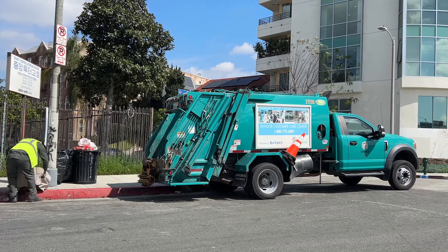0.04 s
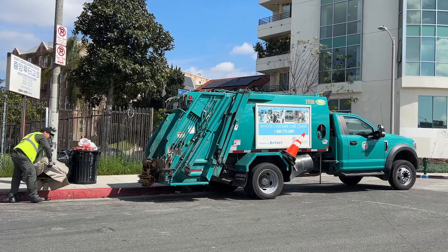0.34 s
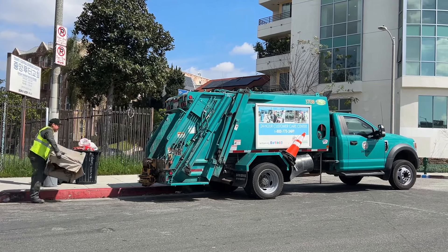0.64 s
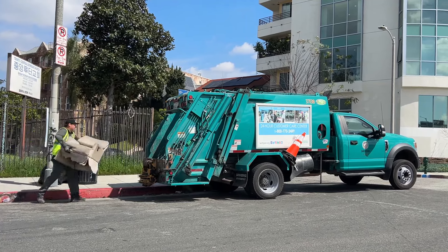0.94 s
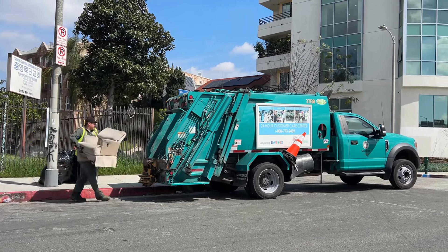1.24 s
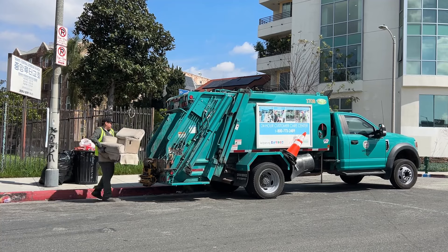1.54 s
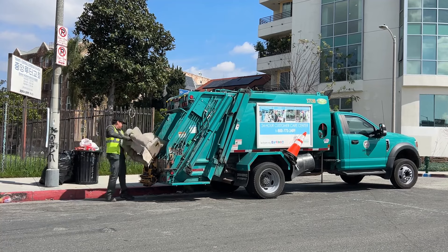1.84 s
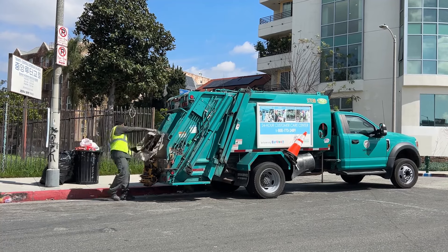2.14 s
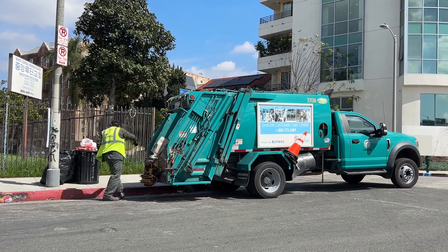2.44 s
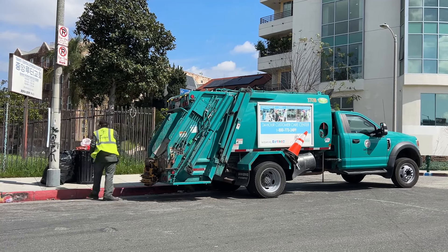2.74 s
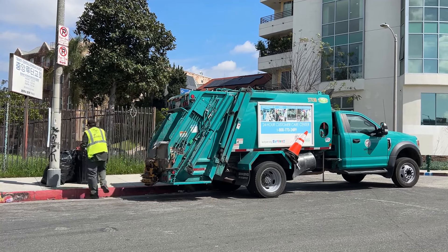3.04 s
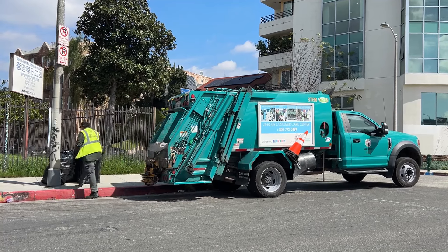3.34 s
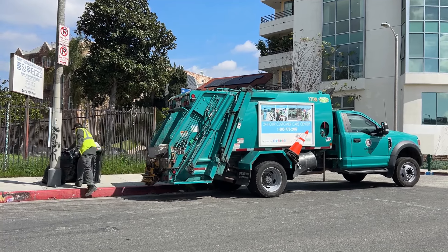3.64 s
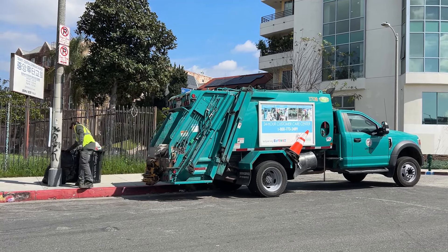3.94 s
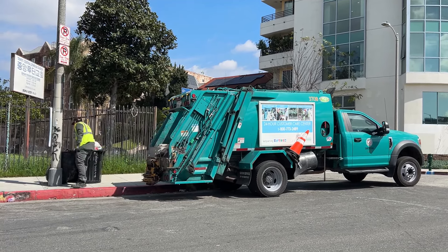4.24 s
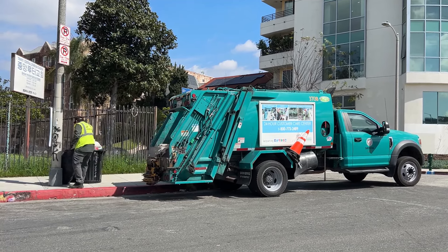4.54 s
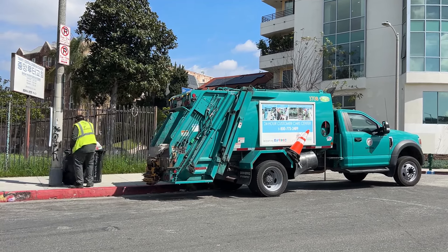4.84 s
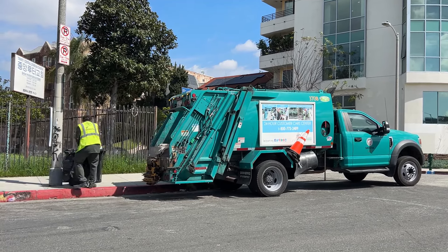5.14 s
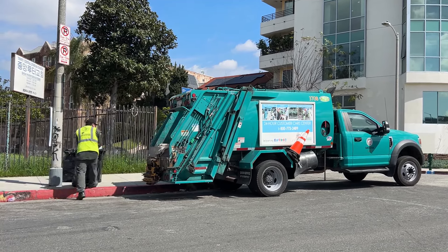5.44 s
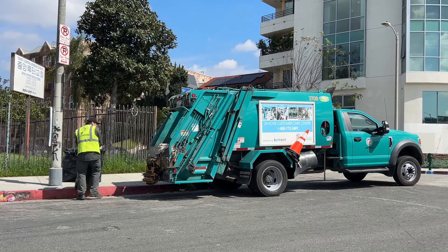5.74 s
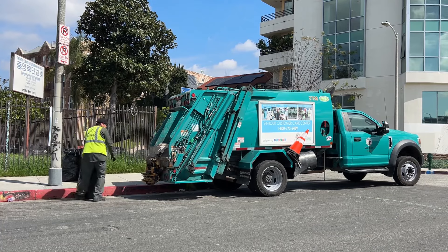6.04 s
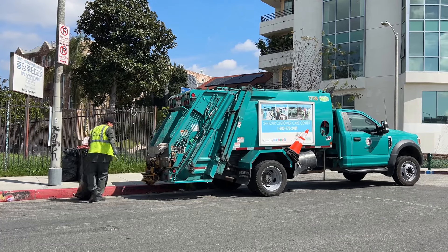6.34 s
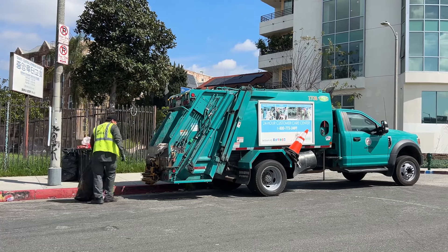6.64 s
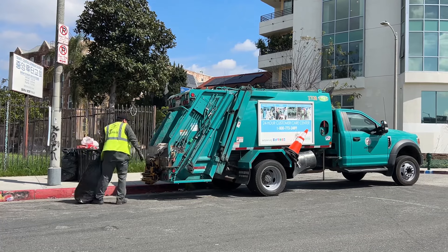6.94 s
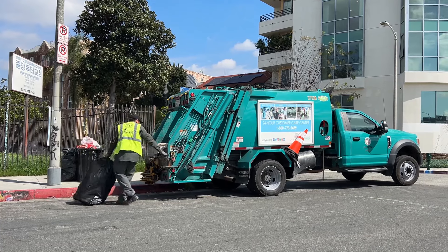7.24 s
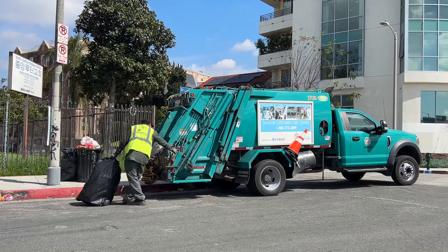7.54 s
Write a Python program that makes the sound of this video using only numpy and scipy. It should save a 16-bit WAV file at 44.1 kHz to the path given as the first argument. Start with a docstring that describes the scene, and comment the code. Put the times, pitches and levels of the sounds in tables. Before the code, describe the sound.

A small garbage truck runs throughout, heard in stereo from across a street. In the first second its revs and whine fall, then it holds a low, loping idle with fan noise and a steady whine. From about 1.8 to 2.5 seconds cardboard is thrown into the hopper, buckling and cracking with several hollow thuds and a short ring of the steel floor. At about 3.1 seconds a steel street bin is banged loudly, with a lighter knock at 3.5. From 4 to 5 seconds a plastic trash bag is gathered, crinkling and snapping, with a soft bump. From about 5.3 to 7.6 seconds it is dragged over the pavement in quiet, swishing pulls, with a small knock near 6. Around 7.7 seconds a quick cluster of heavy knocks hits the tailgate, its steel fittings ringing and chattering. Buildings give the work a faint, short echo.

```python
"""A small garbage truck across the street settles to idle: fan roar, a loping exhaust, a belt-driven whine.
Near 2 s a worker throws cardboard into the hopper; it buckles, thuds and rings the steel floor.
Near 3 s a steel street bin is banged. From 4 s a plastic bag is gathered, then dragged, its film
sliding and its creases snapping. Last come knocks on the tailgate, with ringing, chattering fittings.
House fronts answer the work, and a pair of small microphones hears it all."""
import sys
import numpy as np
from scipy import signal
from scipy.fft import rfft, irfft, next_fast_len
from scipy.io import wavfile

SR = 44100
rng = np.random.default_rng(int(sys.argv[2]) if len(sys.argv) > 2 else 0)


def bounce(signal):
    """Save signal as a 16-bit WAV file at the path given by the first command-line argument."""
    frames = np.transpose(np.atleast_2d(signal))
    limited = np.clip(frames, -1, 1)
    pcm = np.round(limited * 32767).astype(np.int16)
    wavfile.write(sys.argv[1], SR, pcm)


N = 343098
TIME = np.arange(N) / SR

# engine runs down, sags a little and finds its idle: t/s, speed/rpm
ENGINE_RPM = [(0.0, 1191.7), (0.46, 1124.0), (0.82, 1035.6), (2.2, 1010.6), (3.55, 1023.5), (4.0, 1017.7),
              (4.8, 1020.6), (5.25, 1017.8), (7.78, 1023.1)]
# bed of fan, engine bay and distant traffic at idle: f/Hz, level/dB per Hz
ROAR_EQ = [(20, -88), (30, -77), (42, -53.5), (70, -50), (105, -55), (160, -66), (380, -67.5), (680, -75),
           (1000, -72), (1500, -80), (1850, -81), (2600, -90.5), (4200, -90.5), (6300, -97.5),
           (15000, -109)]
# exhaust tones: multiple of the four-stroke cycle (8 is the firing rate), base level/dB
EXHAUST_TONES = [(5, -62), (6, -58.5), (7, -31), (8, -26), (9, -41), (10, -27), (11, -57), (12, -59),
                 (13, -55), (14, -57), (16, -54), (23, -50.5)]
# engine load rides the firing tone: t/s, gain/dB
ENGINE_LOAD = [(0.06, -1.5), (.15, 2), (.6, 3), (.76, -4.5), (2.2, -3), (4.6, 0.5), (5.3, -1.5),
               (7.78, 1.5)]
# resonances that the pump's fundamental slides through: f/Hz, half width/Hz, level/dB
PUMP_PEAKS = [(293.4, 10.7, -26.5), (323.7, 5, -29.5), (346, 5.7, -41)]
# pump overtones: multiple, base level/dB, flutter share (0-1)
PUMP_OVERTONES = [(2, -47, 0.56), (3, -46, 0.48), (4, -55.5, 1), (6, -59.5, 0.9), (9, -67, 0.6),
                  (12, -57.5, 0.99), (13, -69, 0.66), (15, -66, 0.8), (18, -68.5, 0.8)]
# pump housing resonances that the overtones slide through: f/Hz, half width/Hz, gain/dB
HOUSING_PEAKS = [(3673, 72, 7), (4150, 60, 7)]
# overtone lift at full revs: f/Hz at idle, gain/dB
REVVED_EQ = [(590, 4), (880, 2.5), (1180, -0.5), (2600, 3.5), (3500, 2.5), (4400, 7), (5300, 0)]
# pump overtones that rasp only above idle: multiple
RASP_MULTIPLES = [11, 13, 14, 16, 17, 21]

# pulls on the bag: t/s of the fastest slide, length/s, level/dB
BAG_PULLS = [(4.297, .4, -59), (4.62, .2, -52), (4.908, 0.26, -49), (5.818, 0.5, -52.5),
             (6.02, 0.049, -44.5), (6.403, 0.13, -53.5), (6.746, 0.27, -45), (7.04, .05, -50),
             (7.323, 0.54, -51.5)]
# the loudest creases snapping: t/s, level/dB
BAG_SNAPS = [(4.1651, -32), (4.2151, -28), (4.3617, -30), (4.498, -36), (4.565, -38), (4.579, -30),
             (4.638, -33), (4.7138, -27), (5.0834, -35), (6.333, -42), (7.18, -42)]
# colour of sliding plastic film: f/Hz, gain/dB
FILM_EQ = [(300, -20.5), (1500, 2), (4000, -1), (6000, -3.5), (8000, 1), (11500, -8), (15500, -4.5)]
# colour of a snapping crease: f/Hz, gain/dB
CREASE_EQ = [(500, -33.5), (2500, 0.5), (4500, -4), (7500, 0.5), (11000, -10.5), (16000, -9.5)]
# thin sizzle of plastic on pavement and steel on steel: f/Hz, gain/dB
SIZZLE_EQ = [(3000, -35), (8000, -12), (11500, -2.5), (15400, 4), (16500, -7)]

# crushing knocks: t/s, clack level/dB, crack level/dB, fade/s
CRUSHES = [(1.849, -17.5, -34, 0.026), (1.858, -22, -28, .012), (1.869, -26, -25, .016),
           (1.923, -40, -29, .009), (2.167, -29, -31.5, 0.0194), (2.213, -37, -23.5, 0.0067),
           (2.325, -26, -24.5, 0.024), (2.435, -47, -37.5, .01), (2.836, -49, -40, 0.014),
           (3.087, -41, -26.5, 0.03), (3.104, -21.5, -25, 0.029), (3.492, -29.5, -34, .05),
           (3.61, -34, -46.5, .034), (4.2, -45, -58, .09), (4.77, -33.5, -58, 0.1),
           (6.008, -33, -42.5, 0.057), (7.651, -25, -31.5, 0.018), (7.678, -28.5, -33.5, 0.062),
           (7.704, -23, -24.5, 0.013), (7.72, -23, -48, 0.12)]
# dull body of a knock: f/Hz, gain/dB
CLACK_EQ = [(60, -23), (200, 7), (380, 0), (480, 2), (580, -7), (700, -6.5), (860, -0.5), (1300, -9.5),
            (2200, -26), (5000, -29.5), (16000, -60)]
# bright edge of a knock: f/Hz, gain/dB
CRACK_EQ = [(300, -32), (1100, -14.5), (1500, -1), (1780, 7.5), (2200, -3.5), (3800, -0.5), (6000, -10),
            (8500, -8), (12000, -16), (16000, -17.5)]
# heavy hits on hollow containers: t/s, level/dB, pitch factor, damping of highs/dB per octave
HOLLOW_HITS = [(1.852, -20, 1.14, 5.5), (1.868, -21.5, 1.12, 11), (2.163, -28.5, 1.96, 6),
               (2.178, -26.5, 1.2, 4), (2.336, -15, 0.97, 7), (3.131, -14.5, .95, 7), (3.505, -27, 2.56, 6),
               (7.712, -20, 0.86, -2), (7.738, -13.5, 1.02, 2.5)]
# boom of a hollow container: base f/Hz, gain/dB, t60/s
HOLLOW_MODES = [(83, -7.5, 0.34), (115.5, 2, 0.18), (161.3, 0.5, 0.16), (186, 7, .22), (227.6, -1, 0.12),
                (376, -7.5, 0.31), (488, -11, 0.34), (814, -1.5, 0.064)]
# ring of the hopper's steel floor: f/Hz, gain/dB, t60/s
FLOOR_MODES = [(1783, 1, 0.12), (1804, -4.5, 0.077), (1820, -14, 0.081)]
# hits on the steel street bin: t/s, level/dB, damping of highs/dB per octave
BIN_HITS = [(3.087, -18.5, -1), (3.103, -19.5, 2), (3.502, -33, -2)]
# ring of the bin: f/Hz, gain/dB, t60/s
BIN_MODES = [(632, -7.5, 0.23), (1797, -7.5, 0.044), (1846, -0.5, 0.054), (1910, -6, 0.055),
             (2070, -24, 0.037), (3590, -11.5, 0.076), (3838, -13, 0.17)]
# hits on the tailgate's steel fittings: t/s, level/dB, damping of highs/dB per octave
LATCH_HITS = [(7.652, -30.5, -3.5), (7.708, -23.5, 3), (7.724, -24.5, 5)]
# ring of the fittings: f/Hz, gain/dB, t60/s
LATCH_MODES = [(1057, -4.5, 0.091), (1276, -0.5, 0.059), (1463, 1.5, 0.065), (2290, -8, 0.065),
               (2610, -10, .05), (4920, -8, 0.039), (5330, -8, 0.029)]

# stereo width: f/Hz, left-right likeness (1 is mono)
MIC_LIKENESS = [(350, .996), (470, .9), (700, .68), (2500, .65), (4000, .7), (5800, .62), (7600, .87),
                (16000, .86)]
# stereo balance: f/Hz, left minus right/dB
MIC_BALANCE = [(300, 0.5), (700, 1), (1100, 1.5), (1750, -2.5), (2300, 7), (3300, 3.5), (4900, 5),
               (6000, 1), (7500, 0)]
# phase between the microphones: f/Hz, lead of the left/rad
MIC_PHASE = [(0, 0), (1720, -0.7), (3100, 0.7), (5940, -0.8), (6720, 0.1), (8180, -0.1), (9040, -2.8),
             (10200, -3.4), (11100, -6.3), (12000, -6.2), (12800, -9.0), (13700, -9.6), (15100, -12.5),
             (16500, -12.6)]

GATHER_SPAN, DRAG_SPAN = (4.15, 5.0), (5.25, 7.6)  # bag gathered, then dragged: from t/s, to t/s
HOPPER_SPAN, TUMBLE_SPAN = (1.8, 2.6), (1.95, 2.115)  # cardboard on the floor; scraps tumbling after it
KNOCK_ATTACK = 0.153  # share of a knock's fade: long crushes start softly


def amp(db):
    """Decibels to gain."""
    return 10 ** (np.asarray(db) / 20)


def unit(x):
    """Scales to rms 1."""
    return x / np.sqrt(np.mean(x ** 2) + 1e-20)


def curve(rows):
    """An automation lane at every sample."""
    return np.interp(TIME, *np.transpose(rows))


def read(points, hz):
    """Reads a curve on a log-frequency axis."""
    f, value = np.transpose(points)
    return np.interp(np.log(hz + 1), np.log(f + 1), value)


def add(mix, s, sound):
    """Mixes a sound in at time s."""
    part = mix[round(s * SR):][:len(sound)]
    part += sound[:len(part)]


def drift(rate_hz):
    """A smooth random modulator, rms 1."""
    size = next_fast_len(N, True)
    hz = np.fft.rfftfreq(size, 1 / SR)
    return unit(irfft(rfft(rng.standard_normal(size)) * np.exp(-(hz / rate_hz) ** 2), size)[:N])


def colour(x, eq, size=2048):
    """Minimum-phase EQ of unit energy: the curve sets tone, not level."""
    log_gain = np.log(amp(read(eq, abs(np.fft.fftfreq(size, 1 / SR)))))
    taps = np.fft.ifft(np.exp(np.conj(signal.hilbert(log_gain)))).real
    return signal.oaconvolve(x, taps / np.linalg.norm(taps))[:N]


def grains(per_s, spread_db):
    """A dense train of tiny clicks of uneven size, rms 1."""
    size = amp(spread_db * np.minimum(rng.exponential(1, N), 4))
    return unit(size * rng.choice([-1, 1], N) * (rng.random(N) < per_s / SR))


def scattered(span, per_s, spread_db, size=64):
    """Loosely spaced random cues in a span: t/s, level offset/dB."""
    jitter, strength = rng.standard_normal((size, 2)).T
    times = span[0] + (np.arange(size) + .5 + .3 * jitter) / per_s
    return [(s, db) for s, db in zip(times, spread_db * np.clip(strength, -2, 2)) if s < span[1]]


def ring(modes, pitch=1, dull_db=0):
    """Dying modes of one hit; a soft hit tilts them darker around the strongest."""
    t = TIME[:SR // 2]
    centre_hz = max(modes, key=lambda mode: mode[1])[0]
    return sum(amp(db - dull_db * np.log2(hz / centre_hz)) * np.exp(-np.log(1000) * t / t60)
               * np.sin(2 * np.pi * hz * pitch * t) for hz, db, t60 in modes)


def revs():
    """How far the engine is above idle, 0 to 1."""
    idle, top = ENGINE_RPM[-1][1], ENGINE_RPM[0][1]
    return np.clip((curve(ENGINE_RPM) - idle) / (top - idle), 0, 1)


def microphones(x):
    """Two microphones share the direct sound; street scatter and their spacing give it width."""
    size = next_fast_len(N + SR)
    hz = np.fft.rfftfreq(size, 1 / SR)
    taps = rng.standard_normal(N) * np.exp(-TIME / .04) * (TIME > .004)
    scatter = rfft(taps / np.linalg.norm(taps), size)
    likeness = read(MIC_LIKENESS, hz)
    side = np.array([[1], [-1]])
    paths = np.sqrt((1 + likeness) / 2) + side * np.sqrt((1 - likeness) / 2) * scatter
    paths *= amp(side * read(MIC_BALANCE, hz) / 2)
    paths[1] *= np.exp(-1j * np.interp(hz, *np.transpose(MIC_PHASE)))
    return irfft(rfft(x, size) * paths, size)[:, :N]


def street(x, wet_db=-16, t60=0.37, predelay_s=.025, dull_hz=4500):
    """House fronts send back a thin, dull tail."""
    t = TIME[:SR]
    echoes = rng.standard_normal(SR) * (rng.random(SR) < 2000 / SR) * (t > predelay_s)
    tail = signal.lfilter(*signal.butter(1, dull_hz, fs=SR), echoes * np.exp(-np.log(1000) * t / t60))
    return x + amp(wet_db) * signal.oaconvolve(x, tail / np.linalg.norm(tail))[:N]


def roar(cycles, firing_depth=0.28, swell_db=1.36):
    """A bed of air and valve noise: the mids pulse with the firings; mids and highs rise with the revs."""
    hz = np.fft.rfftfreq(N, 1 / SR)
    air = rfft(rng.standard_normal(N)) * amp(read(ROAR_EQ, hz)) * np.sqrt(SR / 2)
    low, high = 1 / (1 + (hz / 600) ** 2), 1 / (1 + (2600 / (hz + 1)) ** 2)
    rumble, valves, hiss = (irfft(air * share, N) for share in (low, 1 - low - high, high))
    overspeed = curve(ENGINE_RPM) / ENGINE_RPM[-1][1] - 1
    pulse = 1 + firing_depth * np.cos(2 * np.pi * 8 * cycles)
    return rumble + (valves * pulse + hiss) * amp(swell_db * drift(10) + 12 * overspeed)


def exhaust(cycles, wobble=0.16, lope_db=-2, revved_lope_db=-14):
    """Two cylinder banks fire unevenly, so the tones swell together once a cycle, most of all at idle."""
    firing = amp(curve(ENGINE_LOAD))
    lope = amp(lope_db + revved_lope_db * revs())
    out = np.zeros(N)
    for k, db in EXHAUST_TONES:
        level = (firing if k == 8 else lope) * amp(db) * (1 + wobble * drift(4.7))
        out += level * np.sqrt(2) * np.cos(2 * np.pi * k * cycles)
    return out


def pump_whine(cycles, per_cycle=34.67, floor_db=-50, build_s=0.85, flutter_hz=6, rasp_db=-59.5):
    """A belt-driven pump: one clean tone, overtones that flutter faster up high, and rasp when revved."""
    angle = 2 * np.pi * per_cycle * cycles + 0.075 * drift(11)
    pitch, revved = per_cycle * np.gradient(cycles) * SR, revs()
    resonance = sum(amp(db) * np.exp(-((pitch - hz) / width) ** 2) for hz, width, db in PUMP_PEAKS)
    pressure = amp(-5 * (1 - revved) * np.exp(-TIME / build_s))  # sags as the revs drop, then builds
    out = (amp(floor_db) + resonance) * pressure * np.sqrt(2) * np.cos(angle) * (1 + 0.08 * drift(8.4))
    for k, db, flutter in PUMP_OVERTONES:
        rate_hz = flutter_hz * np.sqrt(k)
        phase = k * angle + 2 * np.pi * rng.random()
        steady = np.sqrt(2 * (1 - flutter ** 2)) * np.cos(phase)
        shimmer = flutter * (drift(rate_hz) * np.cos(phase) + drift(rate_hz) * np.sin(phase))
        housing_db = sum(gain * np.exp(-((k * pitch - hz) / width) ** 2)
                         for hz, width, gain in HOUSING_PEAKS)
        lift_db = read(REVVED_EQ, k * pitch[-1]) * np.sqrt(revved)
        out += amp(db + housing_db + lift_db) * (steady + shimmer)
    for k in RASP_MULTIPLES:
        rolloff_db = -11 * np.log2(k / RASP_MULTIPLES[0])
        out += np.sqrt(revved) * amp(rasp_db + rolloff_db) * drift(45) * np.cos(k * angle)
    return out


def pull_envelope(handling_db=-63, attack=0.54, roundness=1.33):
    """Sliding plastic swells and fades with each pull, over a faint rustle of handling."""
    power = amp(handling_db) ** 2 * (TIME > GATHER_SPAN[0])
    for s, length, db in BAG_PULLS:
        from_peak = np.maximum((s - TIME) / attack, (TIME - s) / (1 - attack)) / length
        power += amp(db) ** 2 * np.exp(-2 * np.minimum(from_peak, 10) ** roundness)
    return np.sqrt(power)


def bag(slide_trim_db=1, clump_db=1.5, scuff_db=-7.5, crinkle_db=-42.5, snap_trim_db=-1, snap_s=0.00094):
    """Thin plastic slides in clumps of fine grains, scuffs along the pavement, and single creases snap."""
    slide = pull_envelope() * amp(slide_trim_db + clump_db * drift(35))
    scuff = amp(scuff_db) * (TIME > DRAG_SPAN[0]) * slide * grains(6000, 2.3)
    crinkles = scattered(GATHER_SPAN, per_s=17, spread_db=5.5)
    crinkles += scattered(DRAG_SPAN, per_s=6.4, spread_db=5.5)
    snaps, t = np.zeros(N), TIME[:SR // 20]
    for s, db in BAG_SNAPS + [(s, crinkle_db + offset) for s, offset in crinkles]:
        add(snaps, s, amp(db + snap_trim_db) * np.exp(-t / snap_s))
    film = colour(slide * grains(9000, 2.5), FILM_EQ)
    return film + colour(scuff, SIZZLE_EQ) + colour(snaps * rng.standard_normal(N), CREASE_EQ)


def latch_chatter(trim_db=-11, fade_s=.012):
    """The tailgate's steel fittings chatter for a moment at each hit."""
    envelope, t = np.zeros(N), TIME[:SR // 5]
    for s, db, _ in LATCH_HITS:
        add(envelope, s, amp(db + trim_db) * np.exp(-t / fade_s))
    return colour(envelope * grains(6000, 3.7), SIZZLE_EQ)


def knocks(scraps, scrap_clack_db=-44, scrap_crack_db=-45, scrap_fade_s=0.021):
    """Cardboard and rubbish buckle in a burst of small fractures: a dull clack and a bright crack."""
    clack_power, crack_power, t = np.zeros(N), np.zeros(N), TIME[:SR // 2]
    tumbles = [(s, scrap_clack_db + offset, scrap_crack_db + offset, scrap_fade_s) for s, offset in scraps]
    for s, clack_db, crack_db, fade in CRUSHES + tumbles:
        attack_s = KNOCK_ATTACK * fade
        envelope = np.minimum(t / attack_s, 1) * np.exp(-np.maximum(t - attack_s, 0) / fade)
        add(clack_power, s, (amp(clack_db) * envelope) ** 2)
        add(crack_power, s, (amp(crack_db) * envelope) ** 2)
    clack = colour(np.sqrt(clack_power) * grains(5000, 3.0), CLACK_EQ)
    crack = colour(np.sqrt(crack_power) * grains(7000, 2.5), CRACK_EQ)
    return clack + crack


def steel_rings(scraps, floor_send_db=-11.5, scrap_db=-42):
    """Hard hits ring the hopper floor, the street bin and the tailgate fittings."""
    floor_hits = [(s + KNOCK_ATTACK * fade, crack_db + floor_send_db, 0)
                  for s, _, crack_db, fade in CRUSHES if HOPPER_SPAN[0] < s < HOPPER_SPAN[1]]
    floor_hits += [(s, scrap_db + offset, 0) for s, offset in scraps]
    out = np.zeros(N)
    for hits, modes in (floor_hits, FLOOR_MODES), (BIN_HITS, BIN_MODES), (LATCH_HITS, LATCH_MODES):
        for s, db, dull_db in hits:
            add(out, s, amp(db) * ring(modes, dull_db=dull_db))
    return out


def thuds(contact_s=0.0033):
    """Weight lands on hollow walls, which boom with a soft attack."""
    out = np.zeros(N)
    attack = 1 - np.exp(-TIME[:SR // 2] / contact_s)
    for s, db, pitch, dull_db in HOLLOW_HITS:
        add(out, s, amp(db) * ring(HOLLOW_MODES, pitch, dull_db) * attack)
    return out


def scene():
    """The crankshaft clocks the truck's dry layers; the work beside it gets the street's echo."""
    cycles = np.cumsum(curve(ENGINE_RPM)) / SR / 120 - .09  # one four-stroke cycle is two turns
    truck = exhaust(cycles) + pump_whine(cycles) + roar(cycles)
    scraps = scattered(TUMBLE_SPAN, per_s=32, spread_db=1.5)
    work = knocks(scraps) + thuds() + steel_rings(scraps) + latch_chatter() + bag()
    return microphones(truck + street(work))


def record(dry, cutoff_hz=16100):
    """A steep low-pass trims the very top of the mix."""
    lowpass = signal.firwin(511, cutoff_hz, window=("kaiser", 9), fs=SR)
    return signal.oaconvolve(dry, lowpass[None], "same")


dry = scene()
out = record(dry)
bounce(out)
```